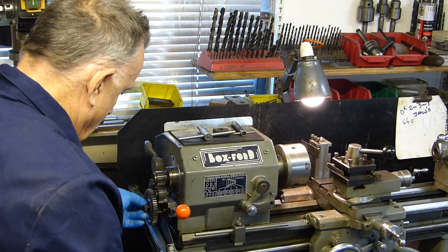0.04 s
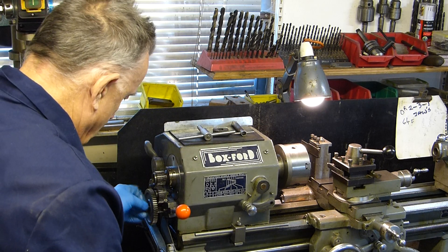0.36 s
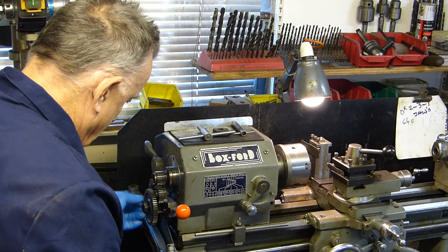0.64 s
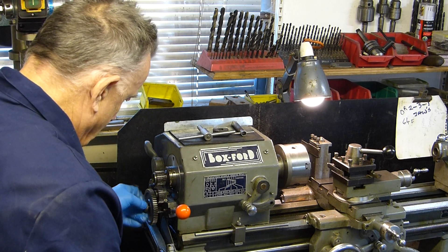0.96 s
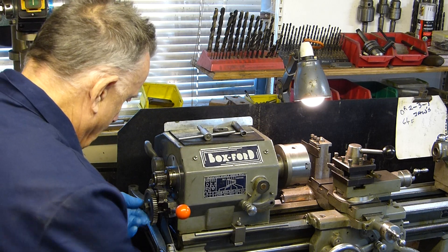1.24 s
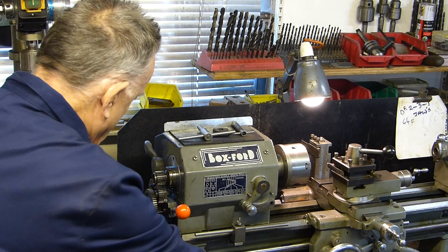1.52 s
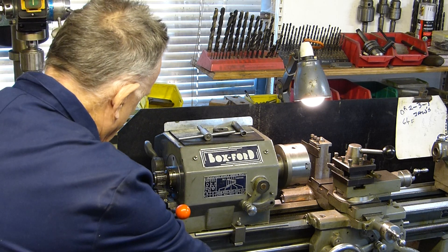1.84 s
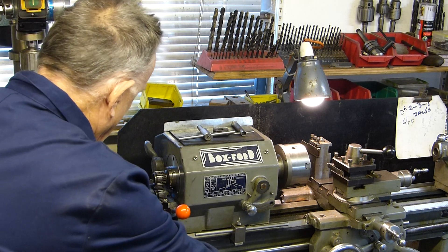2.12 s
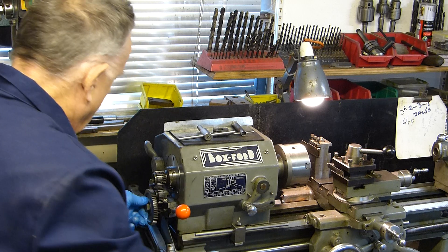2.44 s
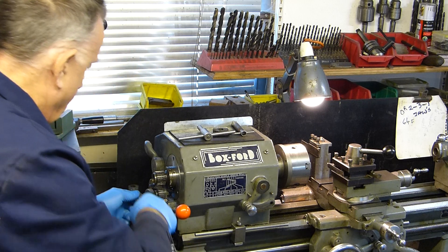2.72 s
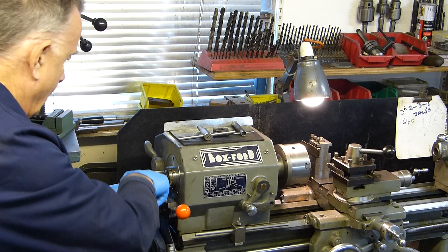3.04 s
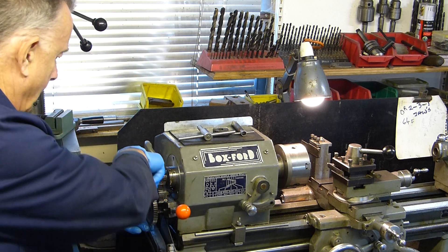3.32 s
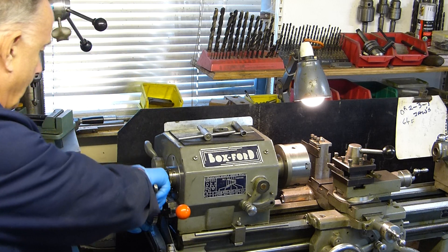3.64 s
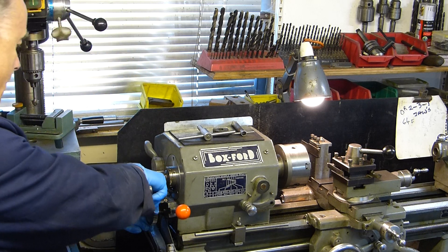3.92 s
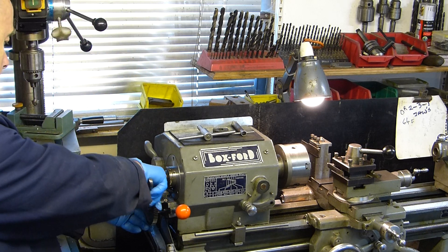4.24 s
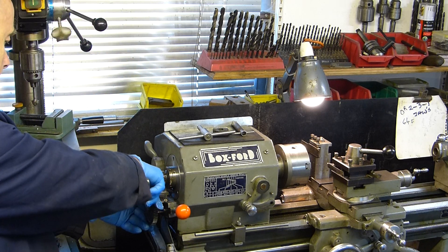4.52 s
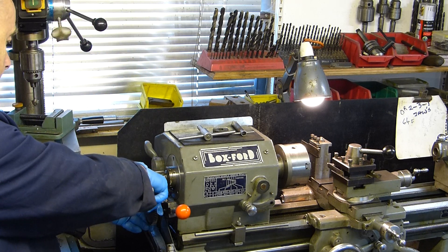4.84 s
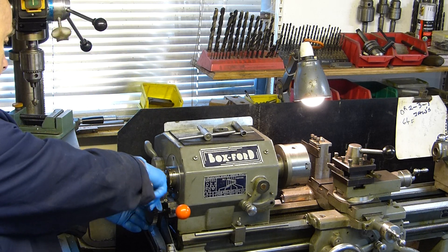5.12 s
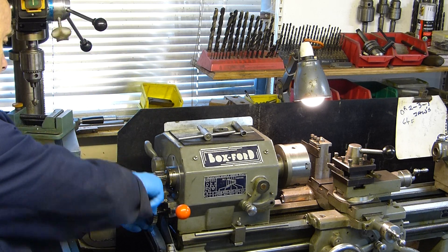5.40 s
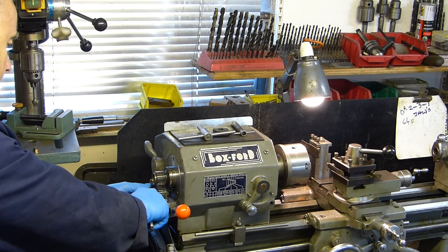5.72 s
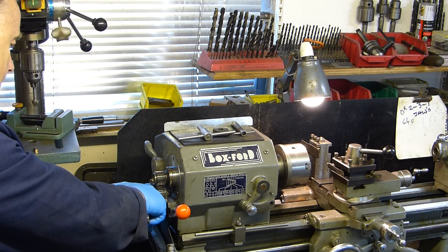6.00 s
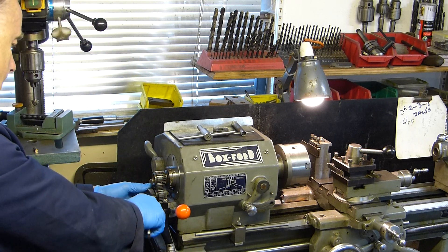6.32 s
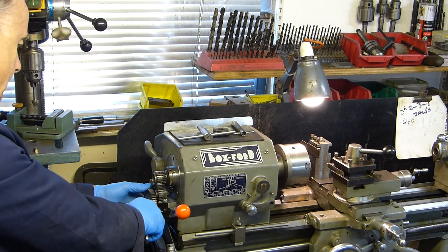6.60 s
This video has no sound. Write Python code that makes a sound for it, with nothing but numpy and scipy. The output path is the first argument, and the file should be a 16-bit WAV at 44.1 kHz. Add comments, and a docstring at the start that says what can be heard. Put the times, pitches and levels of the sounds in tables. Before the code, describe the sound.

In a small workshop, gloves and sleeves rub close by and steel parts click lightly. A gear scrapes along its pin on a lathe with a cluster of bright clinks, then a part drags briefly across the casing. A few ringing taps follow, then quieter handling and one last knock. Further off, a clock ticks once a second over a faint, steady motor hum.

```python
"""A steel gear is fitted onto a lathe in a small workshop, while a clock ticks and a motor hums faintly. First
gloves and sleeves rub, and parts click lightly. At about 1.5 seconds the gear scrapes along its stud (the pin
it sits on) with the loudest clinks, then it drags briefly on the stud with a groan. From 3 seconds on, more
taps set the gear and its fittings ringing, and quieter handling follows. A last knock rings a bracket and the
casing just before the end."""
import sys
import numpy as np
from scipy import signal
from scipy.fft import rfft, irfft, next_fast_len
from scipy.io import wavfile
from scipy.ndimage import uniform_filter1d

SR = 44100
rng = np.random.default_rng(int(sys.argv[2]) if len(sys.argv) > 2 else 0)


def bounce(signal):
    """Save signal as a 16-bit WAV file at the path given by the first command-line argument."""
    frames = np.transpose(np.atleast_2d(signal))
    limited = np.clip(frames, -1, 1)
    pcm = np.round(limited * 32767).astype(np.int16)
    wavfile.write(sys.argv[1], SR, pcm)


N = 298116
T = np.arange(N) / SR

# Levels in the tables are relative. A fade time (t60) is how long a sound takes to drop by 60 dB.
# Steel touching steel. Each row: start in seconds, level in dB, low edge in Hz (higher for a smaller
# part), top edge in Hz (higher for a harder touch), fade time of the chatter in seconds.
TOUCHES = [(0.466, -48, 1200, 8950, .1), (0.572, -47, 1500, 7700, 0.12), (1.219, -30, 4600, 8800, 0.094),
           (1.46, -40, 2200, 10000, 0.037), (1.688, -35.5, 905, 4960, 0.37),
           (1.719, -27, 2150, 14100, 0.096), (1.764, -35.5, 1100, 6260, 0.33),
           (1.843, -14.5, 1484, 6950, .095), (1.913, -31.5, 456, 4400, 0.2),
           (2.957, -55.5, 1490, 13100, 0.039), (3.027, -44, 740, 11000, 0.082),
           (3.082, -51, 704, 4000, 0.16), (3.351, -36, 1050, 6160, 0.21), (3.551, -41, 4500, 11000, 0.067),
           (3.562, -28.5, 2180, 9300, 0.077), (3.756, -47, 1200, 4990, 0.074),
           (4.234, -39.5, 5500, 11300, .07), (4.263, -50, 1600, 3800, 0.17),
           (4.718, -46, 2015, 12500, 0.092), (5.643, -51, 1480, 2800, 0.087), (5.974, -54, 800, 2400, .08),
           (6.035, -51.5, 1000, 5960, .07), (6.073, -56, 700, 5000, 0.13), (6.146, -48, 4940, 10430, 0.084),
           (6.439, -49, 8370, 11900, 0.036), (6.694, -31, 1225, 9600, 0.069)]
# The tone colour all touches share. Each row: frequency in Hz, level in dB.
STEEL_COLOUR = [(150, -8), (300, -15.5), (520, 1), (1050, -5), (1800, 0), (3000, -3.5), (4600, -2),
                (8800, 0.5), (13000, -0.5), (16000, -19)]
# The notes of the lathe's gears. Each row: pitch in Hz, level in dB, fade time in seconds.
LATHE_NOTES = [(1140, -18, .4), (1372, 0, .22), (1674, -9, .3), (1838, -3, .14), (2047, -2, .13),
               (2406, -11, .07), (2914, -4, .13), (3147, -7, .12), (3240, -6, .18), (3451, -8, .18),
               (3558, -4, .2), (3595, -4, .18), (3733, -6, .17), (4046, -2, .14), (4172, -5, .14),
               (4569, -3, .15), (4712, -5, .13), (5608, -3, .19), (5750, -2, .15), (5850, -1, .14),
               (6266, -7, .11), (7165, -7, .16), (7362, -4, .15), (7990, -3, .1), (9200, -6, .1)]
# The notes of each loose part, by name. Each row: pitch in Hz, level in dB, fade time in seconds.
PART_NOTES = { "gear": [(1400, -19, .16), (1560, -20, .1), (1674, -17, .14), (1770, -17, .09),
              (4050, 0, .1), (4170, -10, .1), (8780, -10, .05), (9050, -3, .07), (9185, -6, .06)],
              "spacer": [(5620, -7, .07), (5750, 0, .12), (9080, -3, .04), (11540, -7, .05),
              (13450, -15, .035), (14250, -14, .04)], "washer": [(1085, -17, .14), (1373, -14, .12),
              (1500, -14, .1), (8893, -7, .06), (9810, -2, .025), (9990, -1, .03), (10180, 0, .025),
              (10350, 1, .035)], "bracket": [(330, -11, .2), (520, -8, .14), (791, 1, .12), (1080, -5, .1),
              (2690, -3, .06), (2840, -3, .05), (2954, 0, .05), (3070, -1, .04), (6910, -2, .04)],
              "casing": [(302, -21, 0.33), (386, -1, 0.3), (419, -3, 0.24), (454, -6.5, 0.26),
              (548.4, -5, 0.35), (645, -1.5, 0.19), (804, -6, 0.62), (1154, -3, 0.46)],
              "key": [(10100, 3, 0.014), (11400, -5.5, 0.035), (11800, -11, 0.029)],
              "guard": [(315, -11, 0.19), (338, -1.5, 0.11)], "tray": [(128, -3, .4), (143, 0, .45)], }
# Blows that set a part ringing. Each row: start in seconds, name of the part, level in dB.
BLOWS = [(1.723, "spacer", -22.5), (1.766, "spacer", -48), (1.912, "casing", -47), (1.933, "tray", -49.5),
         (2.179, "guard", -44.5), (3.029, "washer", -32), (3.352, "gear", -25), (3.562, "spacer", -26),
         (3.564, "gear", -28.5), (6.441, "key", -38.5), (6.699, "bracket", -35), (6.704, "casing", -47)]
# Strokes of sleeve and glove, some dragging steel along. Each row: fastest moment in seconds,
# swell time in seconds, hiss level in dB, scrape level in dB, tilt of the hiss in dB per octave.
RUB_STROKES = [(0.02, 0.027, -54.5, -63, -1.5), (0.278, 0.03, -43, -59, 0), (0.37, 0.032, -49, -65.5, -2.5),
               (0.495, 0.032, -51, -58, 0.5), (0.661, 0.045, -51, -61, 0), (0.855, 0.02, -44, -53, 1),
               (0.921, 0.035, -37.5, -54.5, 1), (1.09, 0.037, -55.5, -83, 1), (1.295, 0.026, -40.5, -52, 0),
               (1.455, 0.029, -46.5, -65, -1.5), (2.13, 0.048, -47.5, -56.5, 3),
               (2.207, .022, -43.5, -52, -.5), (2.56, 0.022, -55.5, -81, 13), (3.03, 0.07, -74, -56.5, -8),
               (3.47, 0.095, -56, -66, 10), (3.81, 0.027, -56.5, -60, 1.5), (4.05, 0.048, -57, -73, 10),
               (4.24, .035, -54, -62, 2), (4.43, 0.023, -58, -78.5, 7), (4.77, 0.057, -57, -66.5, 1.5),
               (5.081, 0.033, -59.5, -78.5, 7), (5.44, 0.028, -70, -63.5, -4), (6.25, 0.016, -59, -80, 11),
               (6.701, 0.026, -58, -50, -4)]
# The gear sliding on its stud. Each row: time in seconds, hiss level in dB, scrape level in dB.
SLIDE_LEVELS = [(1.48, -66, -79), (1.515, -48, -56.5), (1.66, -43.5, -51), (1.81, -46.5, -52),
                (1.95, -56, -51), (2.02, -74, -64), (2.12, -75, -71)]
# Hands fidgeting between strokes. Each row: time in seconds, level in dB.
FIDGET_LEVELS = [(0, -72), (1.1, -61.5), (2.3, -59.5), (2.5, -64.5), (2.8, -59.5), (3.2, -66.5), (3.7, -61),
                 (4.35, -77), (4.9, -63.5), (5.4, -67), (5.8, -64), (6.15, -68), (6.5, -84), (6.76, -52.5)]
# Fine hiss, coarse scrape and the groan of the gear on its stud. Each row: frequency in Hz, level in dB.
HISS_COLOUR = [(300, -36.5), (1000, -26), (2800, -10), (4100, 3), (6300, 0.5), (7600, 0.5), (9500, 2.5),
               (11000, -1.5), (12500, -9), (14500, -15), (15900, -26)]
SCRAPE_COLOUR = [(150, -13.5), (500, 2), (1000, 4), (1450, 5.5), (2600, 4.5), (4000, -10), (8000, -10.5)]
GROAN_COLOUR = [(150, -23), (330, -13), (520, -4.5), (800, -10.5), (1200, -3), (1600, 2), (2200, -9),
                (4000, -14), (7000, -13), (13000, -22.5)]
# The notes of the clock's case. Each row: pitch in Hz, level in dB, fade time in seconds.
CLOCK_NOTES = [(520, -10, .08), (660, -2, .05), (735, 0, .055), (810, -5, .05), (970, -10, .1),
               (1130, -9, .11), (1220, -10, .11), (1870, -14, .12), (2880, -14, .06), (3980, -13, .07),
               (5250, -19, .07), (6000, -15, .05), (8100, -14, .04), (8900, -11, .06)]
# The snap of the clock's step and the rasp of its pawl. Each row: frequency in Hz, level in dB.
SNAP_COLOUR = [(200, -22), (600, -4.5), (1150, 13), (2200, 11.5), (4200, 13), (9000, 10.5), (12000, -14)]
PAWL_COLOUR = [(300, -22), (900, -4), (2500, -8.5), (4100, 4.5), (5500, 1.5), (7500, -12), (9500, -5.5),
               (13000, -21)]
# The motor's tones. Each row: pitch in Hz, width of the waver in Hz, level in dB.
MOTOR_NOTES = [(604, 12, -50), (633, 40, -55.5), (1210, 19, -78)]
# The steady noise of the motor and of the room's air. Each row: frequency in Hz, level in dB.
MOTOR_COLOUR = [(50, -108), (130, -101), (190, -94.5), (300, -88), (480, -89.5), (545, -87.5), (680, -78),
                (800, -92), (1200, -92.5), (2000, -106), (5000, -116)]
AIR_COLOUR = [(25, -99), (80, -101), (130, -99), (200, -100), (320, -97), (900, -97), (1500, -101),
              (3000, -106), (6000, -106), (10000, -105), (14000, -111), (15900, -121)]
# The workshop's low hum. Each row: time in seconds, level in dB.
HUM_LEVELS = [(0, -74.5), (1.8, -74), (2.7, -74.5), (3.4, -83), (6.76, -80.5)]

OPPOSITE_EARS = np.array([[1], [-1]])  # adds a sound on the left and its mirror image on the right


def steel_touches(chatter_db=8, ring_db=-5.5, tick_db=10, seat_s=0.0069, rise_s=0.002, body_db=-24):
    """Steel ticks as it touches, chatters briefly as it settles, and rings the lathe's gears."""
    out, t = np.zeros(N), np.arange(SR // 2) / SR
    hz = np.geomspace(100, 16000, 30)
    for s, db, low_hz, top_hz, t60 in TOUCHES:
        # the part sounds between its two edges; the machine's body lets a little bass through
        above_low_edge = 1 / (1 + (low_hz / hz) ** 4.8)
        power = (above_low_edge + undb(body_db) ** 2) / (1 + (hz / top_hz) ** 8)
        shape = np.transpose([hz, 10 * np.log10(power * gain_at(hz, STEEL_COLOUR) ** 2)])
        loudness = np.minimum(t / rise_s, 1) * fade(np.maximum(t - seat_s, 0), t60)
        chatter = undb(chatter_db) * rng.standard_normal(len(t)) * loudness
        gears = undb(ring_db) * ring(LATHE_NOTES) / 2
        add(out, s, undb(db) * colour(chatter + gears, shape))
        tick = colour(signal.unit_impulse(len(t)), shape)
        peak_db = db + tick_db + 4 * np.log2(low_hz / 2000)  # smaller parts tick more sharply
        add(out, s + rise_s, undb(peak_db) * tick / np.abs(tick).max())
    return out


def clinks(rattle_db=-9, rattle_t60=0.043, rattle_hz=1000):
    """The gear, its fittings and the covers ring on after a blow, roughened by a fine rattle."""
    out, t = np.zeros(N), np.arange(SR // 20) / SR
    for s, part, db in BLOWS:
        rattle = high_pass(rng.standard_normal(len(t)) * fade(t, rattle_t60), rattle_hz)
        force = signal.unit_impulse(len(t)) + undb(rattle_db) * rattle / np.linalg.norm(rattle)
        ringing = signal.fftconvolve(ring(PART_NOTES[part]), force)
        lowest_hz = PART_NOTES[part][0][0]  # a part gives off little below its lowest note
        add(out, s, undb(db) * high_pass(ringing, lowest_hz / 2))
    return out


def rubbing(hiss_trim_db=-1, scrape_trim_db=-1):
    """Each stroke of cloth or glove swells and fades as a hiss; sliding steel adds a coarser scrape."""
    out = np.zeros(N)
    cloth = colour(slips(uneven_db=2), HISS_COLOUR)
    steel = unit(colour(slips(uneven_db=2.5), SCRAPE_COLOUR))
    for s, swell_s, cloth_db, steel_db, tilt_db in RUB_STROKES:
        fade_s = 1.31 * swell_s
        span = (T > s - 4 * swell_s) & (T < s + 4 * fade_s)
        width_s = np.where(T[span] < s, swell_s, fade_s)
        speed = np.exp(-.5 * ((T[span] - s) / width_s) ** 2)
        hiss = unit(colour(cloth[span], [(3500, -tilt_db), (14000, tilt_db)]))
        scrape = undb(steel_db + scrape_trim_db) * steel[span]
        out[span] += speed * (undb(cloth_db + hiss_trim_db) * hiss + scrape)
    return out


def gear_slide(catch_db=2.7):
    """The gear scrapes along its stud, catching unevenly."""
    sliding = (T > SLIDE_LEVELS[0][0]) & (T < SLIDE_LEVELS[-1][0])
    hiss_db, scrape_db = curve(SLIDE_LEVELS)
    return sliding * undb(catch_db * wander(rate_hz=46)) * friction(hiss_db, scrape_db, grit_db=4)


def stud_groan(groan_db=-3):
    """The gear drags briefly on its stud, groaning on one note."""
    pressure_db, = curve([(2.16, -100), (2.18, -49), (2.20, -40), (2.222, -39), (2.24, -51),
                          (2.29, -100)])
    scrape = unit(colour(slips(uneven_db=1), GROAN_COLOUR))
    return undb(pressure_db) * (scrape + undb(groan_db) * tone(hz=1370, width_hz=55))


def fidget(uneven_db=2.36):
    """Fingers keep shifting on the parts in small random movements."""
    level_db = curve(FIDGET_LEVELS)[0] + uneven_db * wander(rate_hz=13)
    return undb(level_db) * friction(hiss_db=-1, scrape_db=-5, grit_db=3)


def clock(first_s=0.843, beat_s=1, tick_db=-42, snap_db=-10, rebound_s=0.025, rebound_db=-10,
          pawl_db=-37, pawl_lag_s=0.00663, pawl_s=0.01):
    """The hand steps and bounces, ringing the case; a pawl (a small catch) rasps every other beat."""
    out, t = np.zeros(N), np.arange(SR // 2) / SR
    for beat, s in enumerate(np.arange(first_s, N / SR, beat_s)):
        snap = colour(rng.standard_normal(len(t)) * fade(t, t60=0.035), SNAP_COLOUR)
        add(out, s, undb(tick_db) * (ring(CLOCK_NOTES) + undb(snap_db) * snap))
        add(out, s + rebound_s, undb(tick_db + rebound_db) * (ring(CLOCK_NOTES) + snap))
        if beat % 2:
            catch = np.exp(-np.abs(T - s - pawl_lag_s) / pawl_s)
            out += undb(pawl_db) * colour(rng.standard_normal(N) * catch, PAWL_COLOUR)
    return high_pass(out, hz=300)


def background(motor_middle_db=-20.5, air_side_db=-5):
    """Room air, a low hum, and a small nearby motor that shakes left and right in opposite ways."""
    motor = noise(MOTOR_COLOUR) + sum(undb(db) * tone(hz, width) for hz, width, db in MOTOR_NOTES)
    hum = undb(curve(HUM_LEVELS)[0]) * tone(hz=132, width_hz=27)
    side = motor + undb(air_side_db) * noise(AIR_COLOUR)
    return noise(AIR_COLOUR) + hum + undb(motor_middle_db) * motor + side * OPPOSITE_EARS


def workshop(x, middle_db, side_db, t60=0.19, low_t60=0.25):
    """A small cluttered room adds a short, dense echo that lasts longer in the low notes."""
    t = np.arange(SR // 2) / SR
    low_pass = signal.butter(2, 1800, fs=SR, output="sos")
    echoes = []
    for white in rng.standard_normal((2, len(t))):
        lingering_lows = signal.sosfilt(low_pass, white) * (fade(t, low_t60) - fade(t, t60))
        tail = (white * fade(t, t60) + lingering_lows) * (t > .002)
        echoes.append(signal.fftconvolve(x, tail / np.linalg.norm(tail))[:N])
    middle, side = echoes
    return x + undb(middle_db) * middle + undb(side_db) * side * OPPOSITE_EARS


def machine_echoes(x, width_db, t60=0.026):
    """Nearby faces of the machine bounce the sound differently into each ear."""
    t = np.arange(SR // 20) / SR
    early = rng.standard_normal(len(t)) * fade(t, t60)
    return undb(width_db) * signal.fftconvolve(x, early / np.linalg.norm(early))[:N] * OPPOSITE_EARS


def ring(notes, detune=0.0017):
    """A struck object rings with fading notes; every blow lands a little differently."""
    t = np.arange(SR // 2) / SR
    out = np.zeros(len(t))
    for hz, db, t60 in notes:
        shift, push = rng.standard_normal(2)
        pitch_hz = hz * (1 + detune * shift)
        out += undb(db) * fade(t, t60) * np.sign(push) * np.sin(2 * np.pi * pitch_hz * t)
    return out


def friction(hiss_db, scrape_db, grit_db):
    """Fine hiss plus coarse scrape; grit makes the slips more uneven."""
    hiss = unit(colour(slips(grit_db), HISS_COLOUR))
    scrape = unit(colour(slips(grit_db), SCRAPE_COLOUR))
    return undb(hiss_db) * hiss + undb(scrape_db) * scrape


def slips(uneven_db):
    """Rubbing surfaces make a dense stream of tiny slips of uneven size."""
    white = rng.standard_normal(N)
    sizes = np.repeat(rng.standard_normal(N // 32 + 1), 32)[:N]
    return unit(white * undb(uneven_db * sizes))


def tone(hz, width_hz):
    """A wavering tone: noise narrowed to a thin band around one pitch."""
    f = np.arange(N // 2 + 1) * SR / N
    return unit(irfft(rfft(rng.standard_normal(N)) / (1 + ((f - hz) / width_hz) ** 2), N))


def noise(points):
    """Steady noise with the given strength per Hz."""
    return colour(rng.standard_normal(N), points) * np.sqrt(SR / 2)


def wander(rate_hz):
    """A smooth random drift, roughly between -1 and 1."""
    hold = int(SR / rate_hz)
    steps = rng.standard_normal(size=1024)[np.arange(N) // hold]
    return 1.4 * uniform_filter1d(uniform_filter1d(steps, hold), hold)


def colour(x, points):
    """Give a sound the tone colour set by (Hz, dB) points."""
    size = next_fast_len(len(x) + SR // 10, True) * 2
    hz = np.arange(size // 2 + 1) * SR / size
    cepstrum = irfft(np.log(gain_at(hz, points)))
    # fold the second half onto the first, so nothing rings before the sound starts
    cepstrum[1:size // 2] *= 2
    cepstrum[size // 2 + 1:] = 0
    return irfft(rfft(x, size) * np.exp(rfft(cepstrum)))[:len(x)]


def gain_at(hz, points):
    """Read the gain at hz between (Hz, dB) points, spaced by octaves."""
    f, db = np.transpose(points)
    return undb(np.interp(np.log(hz + 1), np.log(f), db))


def high_pass(x, hz):
    """Remove what lies below hz."""
    return signal.sosfilt(signal.butter(4, hz, "high", fs=SR, output="sos"), x)


def curve(rows):
    """Join timed rows with straight lines, one curve for each column of values."""
    s, *columns = np.transpose(rows)
    return [np.interp(T, s, c) for c in columns]


def fade(t, t60):
    """Die away by 60 dB every t60 seconds."""
    return np.exp(-np.log(1000) * t / max(t60, 1e-3))


def add(track, s, x):
    """Mix a sound into a track at s seconds."""
    i = int(s * SR)
    track[i:i + len(x)] += x[:N - i]


def undb(db):
    """Turn decibels into a multiplier."""
    return 10 ** (np.asarray(db) / 20)


def unit(x):
    """Scale to an average strength (rms) of 1."""
    return x / np.sqrt(np.mean(x ** 2))


def scene():
    """Work at the lathe is near; the clock hangs further off."""
    work = steel_touches() + clinks() + rubbing() + gear_slide() + fidget() + stud_groan()
    work = high_pass(work, hz=110)  # small stiff parts give off almost no deep bass
    near = workshop(work, middle_db=-6, side_db=-12.5) + machine_echoes(work, width_db=-12)
    return near + workshop(clock(), middle_db=-3, side_db=-2) + background()


def record(dry, top_hz=15800):
    """Cut away the very highest treble."""
    return signal.sosfilt(signal.ellip(10, .2, 70, top_hz, fs=SR, output="sos"), dry)


dry = scene()
out = record(dry)
bounce(out)
```